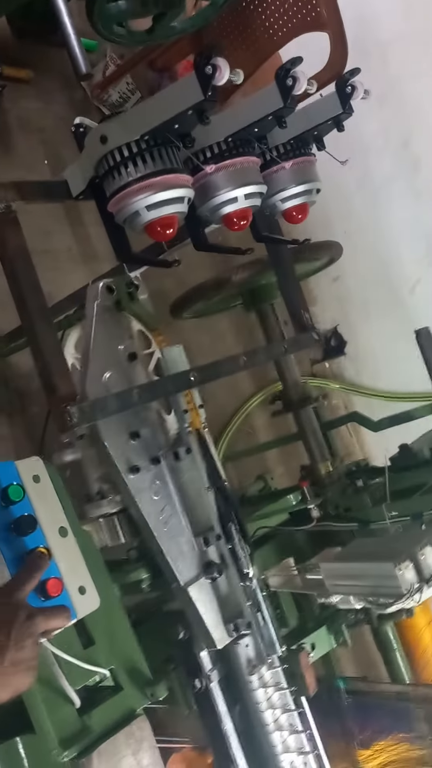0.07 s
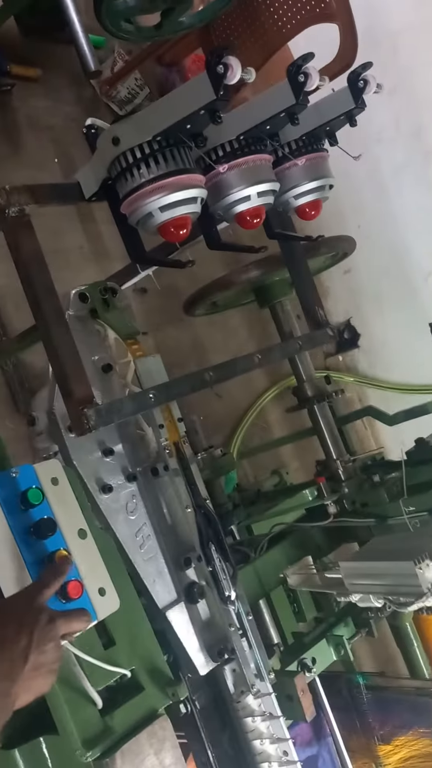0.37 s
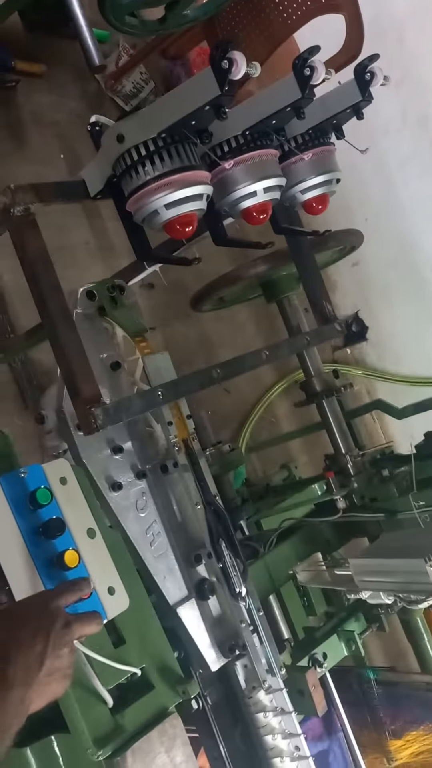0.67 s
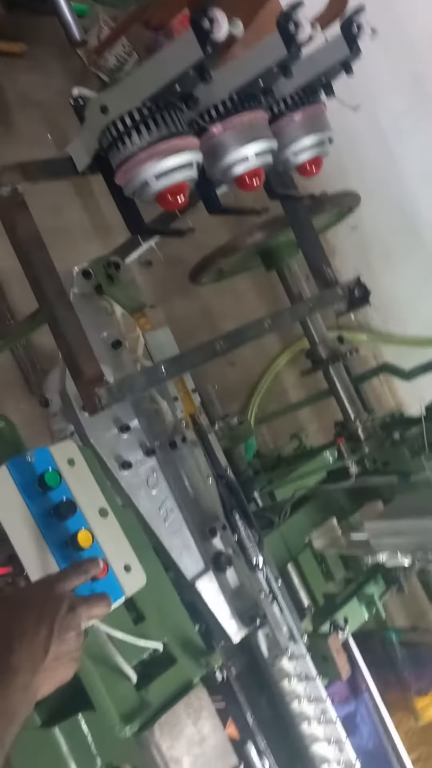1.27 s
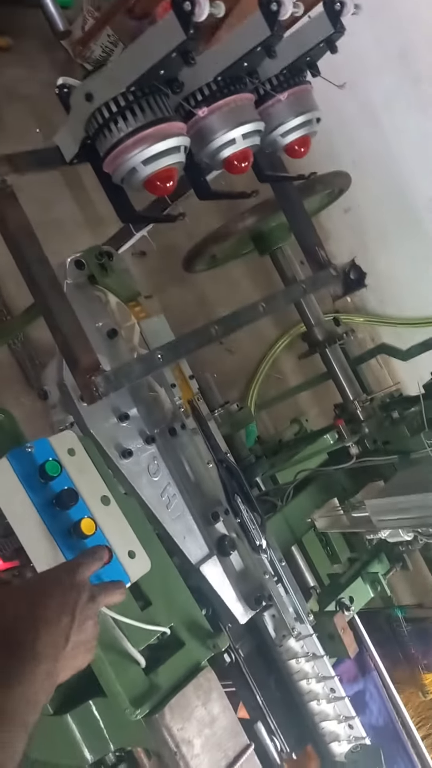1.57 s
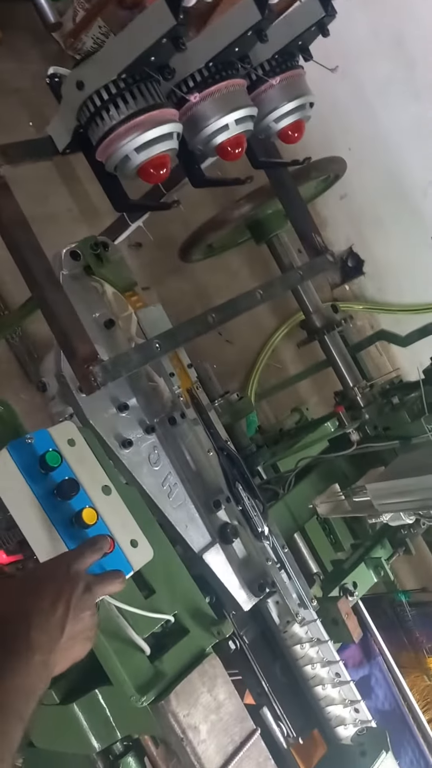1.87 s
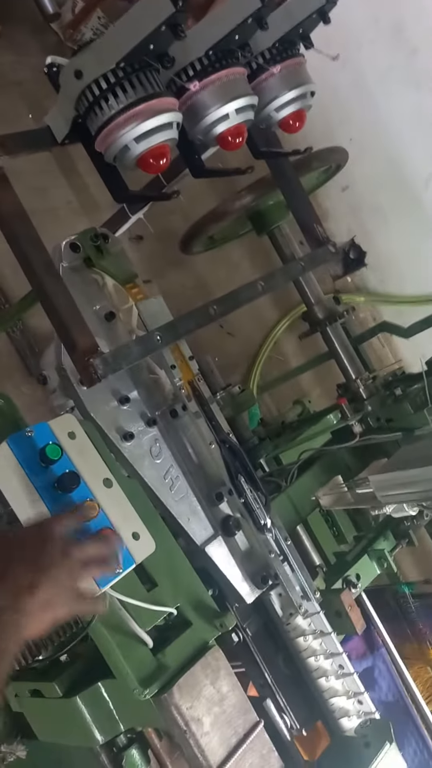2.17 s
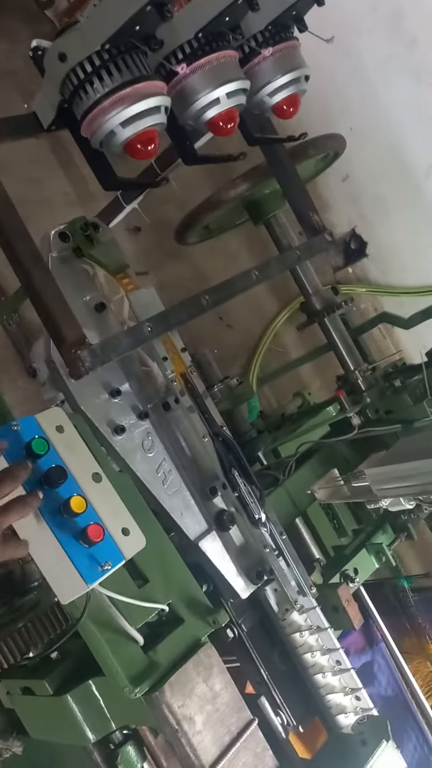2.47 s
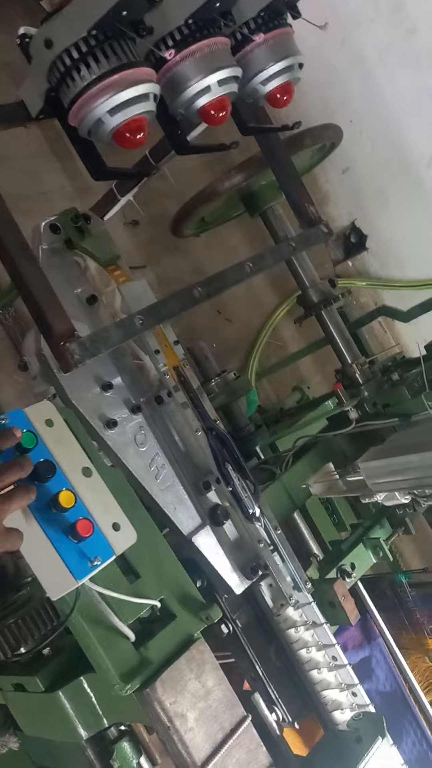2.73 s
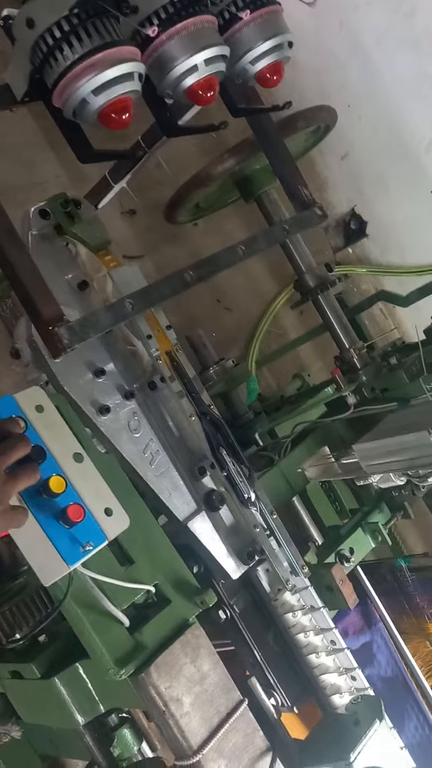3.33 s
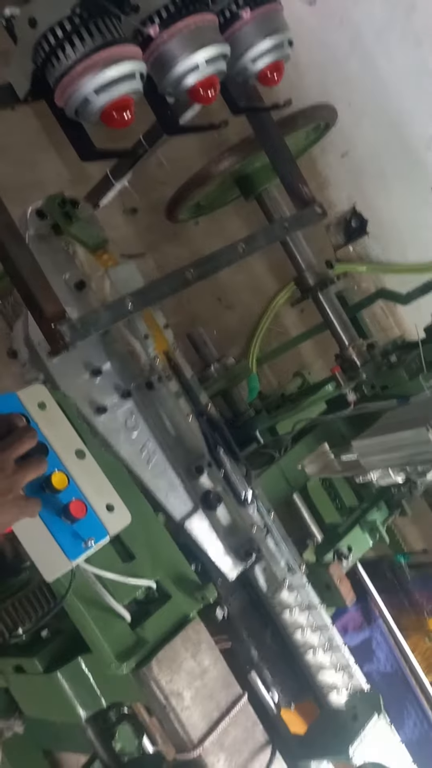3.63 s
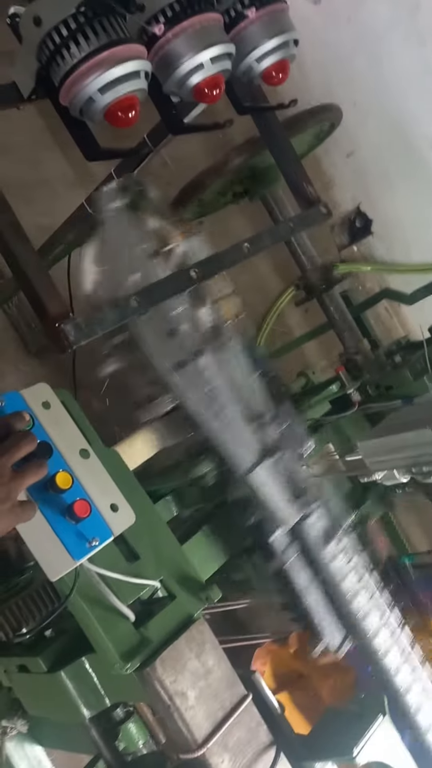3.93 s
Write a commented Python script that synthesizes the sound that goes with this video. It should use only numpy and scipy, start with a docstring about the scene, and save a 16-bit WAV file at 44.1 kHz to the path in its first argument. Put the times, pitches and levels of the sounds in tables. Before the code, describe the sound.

A weaving machine gives a short, loud burst of metallic rattling with motor hum and thin squeaks. Quiet button clicks fill the lull before it suddenly starts again, ringing through the workshop.

```python
"""Inching a narrow-fabric loom

A loom is inched twice from its button box in a hard, echoing workshop. Each time the drive engages
with a clunk, the motor hums, and the impacts of gears, levers and wire heddles excite the frame's
resonances while dry guides squeak. In the lull the frame drones out, push buttons click and a hand
brushes past, over a faint air hiss."""
import sys
import numpy as np
from scipy import signal
from scipy.fft import rfft, irfft
from scipy.io import wavfile

SR = 44100
rng = np.random.default_rng(int(sys.argv[2]) if len(sys.argv) > 2 else 0)


def persist_wave(psi):
    """Save psi, clipped to +-1, as 16-bit WAV."""
    counts = np.round(np.clip(psi, -1, 1) * 32767).astype(np.int16)
    wavfile.write(sys.argv[1], SR, np.atleast_2d(counts).T)


N = 176400
LEAD = SR // 4  # samples before t = 0 in which the filters settle
TIME = np.arange(-LEAD, N) / SR
HZ = np.fft.rfftfreq(4096, 1 / SR)

# Reverberation time of the workshop: f/Hz, T60/s
REVERB_TIME = [(80, 2.4), (300, 0.71), (1000, 0.81), (3000, 0.68), (6000, 0.48), (10000, 0.38),
               (16000, 0.45)]
# Coherence of the diffuse field: f/Hz, left-right correlation
COHERENCE = [(60, 0.92), (150, 0.95), (300, 0.87), (550, 0.41), (1000, -.05), (2000, -0.14), (5000, .05),
             (16000, -0.26)]
# Imbalance of the microphone ports: f/Hz, left minus right/dB
PORT_BALANCE = [(100, 1.6), (600, 0.5), (1200, 1.6), (2500, -2.3), (4500, -2.5), (7000, 10.5), (9500, 8.5),
                (13000, 3), (16000, 2.5)]
# Spectra of room noise, air hiss, rubbing cloth and a button click: f/Hz, relative level/dB
AIR_SPECTRUM = [(20, -54.5), (35, -32), (50, -17.5), (72, -3), (120, -7.5), (177, -13.5), (215, -10),
                (344, -16.5), (426, -16.5), (560, -19.5), (1000, -27.5), (1540, -27), (2500, -33.5),
                (5000, -36.5), (6500, -61.5)]
HISS_SPECTRUM = [(100, -50), (1000, -28), (5000, -19), (5700, -3.5), (6300, -6), (6900, 0), (7600, -16),
                 (8500, -14), (9500, -21.5), (16000, -28)]
CLOTH_SPECTRUM = [(40, -49), (150, -13), (600, -1), (1500, 0.5), (4200, 1.5), (6000, -4), (9000, -9),
                  (13000, -6), (16000, -10.5)]
BUTTON_SPECTRUM = [(100, -19), (400, -7), (650, 3.5), (950, -4.5), (1400, 1), (3000, -1), (5000, -1.5),
                   (7500, -3.5), (9300, -6.5), (12500, 2.5), (14500, -2.5), (16000, -8)]
# Strokes of hand and sleeve: centre t/s, half-length/s, level/dB, treble tilt/(dB per octave)
BRUSH_STROKES = [(2.12, .05, -60.5, -3), (2.351, 0.042, -67.5, -4.5), (2.587, 0.06, -59, 1.5)]
# Button clicks: t/s, level/dB, then lift/dB in each of the four button resonances
BUTTON_CLICKS = [(0.0219, -43, -1.5, 12, 8, 4), (0.6806, -37.5, -4, -14, 16, 4.5),
                 (0.8727, -43.5, 1, 8.5, -3, 5.5), (1.3678, -47.5, 13, 13.5, 6, 3),
                 (1.6486, -48.5, 3, -4, -2, 4), (1.8626, -49, 12.5, -4, -4, 4.5),
                 (2.0392, -43.5, 8, 6, 1.5, 7), (3.4884, -51, 13, -6, -3, 8), (3.523, -49, 4, 1, -2, 5)]
# Button resonances (box knock, plate ring, mid snap, high ring): f/Hz, half-width/Hz
BUTTON_MODES = [(660, 170), (1220, 58), (2600, 910), (7400, 1000)]
# Squeaks of dry guides: start t/s, length/s, f/Hz, level/dB
GUIDE_SQUEAKS = [(.11, .08, 10250, -51), (.32, 0.11, 11230, -45.5), (.37, 0.093, 12660, -49),
                 (.29, 0.12, 15542, -53), (.3, 0.081, 7100, -49), (3.62, 0.16, 10270, -48.5),
                 (3.65, 0.14, 7500, -46), (3.65, 0.12, 8500, -48), (3.83, 0.13, 10200, -50),
                 (3.77, 0.14, 11870, -57), (3.77, 0.16, 6200, -45)]
# Resonances of the cast frame: f/Hz, width/Hz, lift/dB
FRAME_MODES = [(214, 22, 3.5), (263, 47, 4.5), (316, 51, 4.5), (504, 56, 3), (770, 20, 3), (804, 34, 1.5),
               (790, 51, -0.5), (923, 40, 4), (1360, 45, 5.5), (1548, 89, 6.5), (2042, 80, 7.5),
               (2705, 40, 4.5), (3430, 15, 5.5)]
# Drone of the frame: f/Hz, level/dB, start of decay t/s, decay while turning/(dB per s)
DRONE_PARTIALS = [(109.8, -36.5, 0.55, 26.5), (68.1, -45.5, .45, 20)]
# Spans of motor power: on t/s, off t/s
POWER_SPANS = [(.16, .42), (3.57, 3.97)]
# Blows in the drive: t/s, level/dB, treble tilt/(dB per octave), scatter time/s, reverberation/dB
DRIVE_BLOWS = [(.023, -33, -7, 0.0038, -0.5), (0.0753, -13, 0.2, .016, 4.5), (.271, -20, -1, 0.0037, -6),
               (.308, -18, -6.5, 0.002, -7.5), (.346, -22.5, -7, 0.0027, -7),
               (0.475, -25, -0.5, .002, -6.5), (.4994, -21, -2, .008, -5), (3.5414, -17, 0.9, 0.028, 5.5),
               (3.595, -20.5, -8, .006, 5.5), (3.7712, -19.5, 2.5, 0.011, 4)]
# Spectra of the belt, a blow and the moving parts: f/Hz, relative level/dB
BELT_SPECTRUM = [(25, -35), (40, -31), (52, -13), (70, 1.5), (95, -2.5), (115, -4.5), (145, -2), (200, -23),
                 (1000, -71)]
BLOW_SPECTRUM = [(40, -48), (130, -17), (215, -1), (310, -1.5), (400, -7.5), (520, -3), (900, -8),
                 (1200, -14.5), (1600, -14), (4500, -19.5), (6500, -28.5), (16000, -37)]
GEAR_SPECTRUM = [(30, -54), (50, -37.5), (75, -21), (115, -24), (160, -12.5), (200, -8), (260, -5),
                 (330, 0), (420, -2.5), (520, -5), (750, -17.5), (2000, -34), (16000, -78)]
LEVER_SPECTRUM = [(60, -49.5), (300, -16.5), (500, 1), (800, -0.5), (1100, -2), (1500, -5.5), (2200, -12.5),
                  (5000, -28.5), (16000, -50)]
HEDDLE_SPECTRUM = [(40, -60), (200, -30.5), (700, -8.5), (1500, 0), (2200, -1.5), (3000, .5), (4200, -.5),
                   (6000, -12.5), (9000, -16.5), (12000, -12), (16000, -18.5)]
# Envelopes of the two runs: t/s, gear level/dB, lever level/dB, heddle level/dB
FIRST_RUN_LEVELS = [(0, -38.5, -40.5, -54), (.07, -45, -65, -54), (.09, -35, -29.5, -43.5),
                    (.17, -28, -34, -28.5), (.2, -27, -25, -18.5), (.24, -19, -19, -22),
                    (.3, -24.5, -31, -25), (.38, -29, -26.5, -29.5), (.5, -29, -31, -38),
                    (.62, -36, -38, -53), (.8, -43, -52.5, -60), (.97, -54, -88.5, -77),
                    (1.15, -68.5, -80, -92), (1.6, -76, -88.5, -108.5)]
SECOND_RUN_LEVELS = [(3.54, -42, -30, -33.5), (3.62, -33.5, -28, -34.5), (3.7, -30, -32, -37.5),
                     (3.765, -36, -24, -46), (3.81, -26.5, -28, -27), (3.86, -29, -22, -22.5),
                     (3.92, -30.5, -22.5, -42.5), (4, -31, -37.5, -38)]


def amp(db):
    """Amplitude ratio of a level in decibels."""
    return 10 ** (np.asarray(db) / 20)


def unit(x):
    """Normalisation to an rms of 1."""
    return x / np.sqrt(np.mean(x ** 2) + 1e-20)


def curve(points, hz=HZ):
    """Interpolation on a logarithmic frequency axis."""
    f, value = np.transpose(points)
    return np.interp(np.log(hz + 1), np.log(f + 1), value)


def add(mix, start_s, sound):
    """Superposition of a stereo sound on the mix."""
    part = mix[:, round(start_s * SR):][:, :sound.shape[1]]
    part += sound[:, :part.shape[1]]


def tilt(db_per_octave):
    """Spectral slope above 500 Hz, as a lift in dB."""
    return db_per_octave * np.log2(np.maximum(HZ / 500, 1))


def colour(x, spectrum_db):
    """Minimum-phase filtering at unit energy: folding the cepstrum makes the response causal."""
    cepstrum = irfft(np.log(amp(spectrum_db)))
    half = len(cepstrum) // 2
    folded = np.r_[cepstrum[0], 2 * cepstrum[1:half], np.zeros(half)]
    response = irfft(np.exp(rfft(folded)))
    return signal.oaconvolve(x, response / np.linalg.norm(response))


def wander(count, rate_hz):
    """Random modulation: low-pass noise with an rms near 1."""
    hz = np.fft.rfftfreq(N * 2, 1 / SR)
    white = rfft(rng.standard_normal(N * 2))
    return unit(irfft(white * np.exp(-(hz / rate_hz) ** 2)))[:count]


def diffuse(count, dying=False):
    """Diffuse field: noise coherent between the ears in the bass; if dying, it falls 60 dB per T60."""
    hz, t, (left, other) = signal.stft(rng.standard_normal((2, count)), SR, nperseg=512)
    coherence = np.clip(curve(COHERENCE, hz), -1, 1)[:, None]
    field = np.array([left, coherence * left + np.sqrt(1 - coherence ** 2) * other])
    if dying:
        field = field * amp(-60 * t / curve(REVERB_TIME, hz)[:, None])
    return signal.istft(field, SR, nperseg=512)[1][:, :count]


def room(x, direct_db, wet_db):
    """Reverberation: convolution with a direct impulse and a diffuse tail."""
    tail = diffuse(SR * 3 // 2, dying=True)
    tail *= np.minimum(np.arange(tail.shape[1]) / SR / 0.0027, 1)  # reflections build up
    response = tail * amp(wet_db) / np.linalg.norm(tail[0])
    response[:, 0] += amp(direct_db)
    return signal.fftconvolve(x[None], response, axes=1)


def strike(spectrum_db, scatter_s, direct_db, wet_db):
    """Impact response: sharp front, short scatter and room tail, with about the energy of 10 ms at rms 1."""
    t = np.arange(SR * 3 // 2) / SR
    tail = diffuse(len(t), dying=True) * np.minimum(t / 0.0063, 1)
    scatter = diffuse(len(t)) * np.exp(-t / scatter_s)
    blow = scatter / np.linalg.norm(scatter[0]) + amp(wet_db) * tail / np.linalg.norm(tail[0])
    blow[:, 0] += amp(direct_db)
    gain = np.sqrt(SR / 100) / np.linalg.norm(blow[0])
    return gain * np.array([colour(x, spectrum_db) for x in blow])


def frame_lift():
    """Resonance: each mode of the frame adds a Lorentzian peak, in dB, to the spectrum of an impact."""
    return sum(db / (1 + (2 * (HZ - hz) / width) ** 2) for hz, width, db in FRAME_MODES)


def workshop_air():
    """Diffuse background: low room noise and a narrow band of air hiss, stronger on the left."""
    air = np.array([colour(x, curve(AIR_SPECTRUM))[LEAD:LEAD + N] for x in diffuse(len(TIME))])
    hiss = np.array([colour(x, curve(HISS_SPECTRUM))[LEAD:LEAD + N] for x in diffuse(len(TIME))])
    hiss_level = amp(-75.5 + 0.84 * wander(N, rate_hz=14))
    pan = amp([[1.5], [-1.5]])
    return amp(-66.5) * air + hiss * hiss_level * pan


def brushes():
    """Sliding friction: hand and sleeve rub the box in Gaussian swells of noise."""
    out = np.zeros((2, N))
    for centre_s, half_s, db, slope in BRUSH_STROKES:
        t = np.arange(-3 * half_s, 3 * half_s, 1 / SR)
        friction = rng.standard_normal(len(t)) * np.exp(-(t / half_s) ** 2)
        rub = colour(friction, curve(CLOTH_SPECTRUM) + tilt(slope))
        add(out, centre_s + t[0], amp(db) * room(rub, direct_db=-5.5, wet_db=1.5))
    return out


def buttons():
    """Impulse excitation: each snap of a plastic button weights the resonances of its box differently."""
    out = np.zeros((2, N))
    for start_s, db, *lifts_db in BUTTON_CLICKS:
        lift = sum(peak_db * np.exp(-((HZ - hz) / width) ** 2)
                   for peak_db, (hz, width) in zip(lifts_db, BUTTON_MODES))
        click = strike(curve(BUTTON_SPECTRUM) + lift, scatter_s=0.0014, direct_db=-9.5, wet_db=1.5)
        add(out, start_s, amp(db) * click)
    return out


def squeaks(jitter_hz=65, stutter_db=3.5):
    """Friction-excited vibration: steel sliding in dry guides gives thin, ragged tones."""
    out = np.zeros((2, N))
    for start_s, length_s, hz, db in GUIDE_SQUEAKS:
        t = np.arange(0, length_s, 1 / SR)
        cycles = np.cumsum(hz + jitter_hz * wander(len(t), rate_hz=120)) / SR
        tone = np.sqrt(np.sin(np.pi * t / length_s)) * np.sin(2 * np.pi * cycles)
        stutter = amp(stutter_db * wander(len(t), rate_hz=66))
        add(out, start_s, amp(db) * room(tone * stutter, direct_db=-3.5, wet_db=-2))
    return out


def wavering_tone(hz, drift_hz, rate_hz):
    """Random frequency modulation of a sine with an rms of 1."""
    cycles = np.cumsum(hz + drift_hz * wander(N, rate_hz)) / SR
    return np.sqrt(2) * np.sin(2 * np.pi * cycles)


def frame_drone(rest_s=1.65):
    """Damped vibration: the frame swells with the first run, decays, and dies once the shaft rests."""
    t, out = TIME[LEAD:], np.zeros(N)
    for hz, db, decay_start_s, db_per_s in DRONE_PARTIALS:
        swell = np.minimum((t + 0.11) / decay_start_s, 1)
        decay_db = db_per_s * np.maximum(t - decay_start_s, 0)
        level = swell * amp(db - decay_db + 3.4 * wander(N, rate_hz=40))
        out += level * wavering_tone(hz, drift_hz=1.6, rate_hz=8.1)
    return out * np.exp(-np.maximum(t - rest_s, 0) / 0.12)


def motor(rise_s=0.097, decay_s=0.16):
    """Forced vibration: motor hum and belt rumble grow under power and fade when it is cut."""
    t = TIME[LEAD:]
    envelope = sum(np.clip((t - on) / rise_s, 0, 1) * np.exp(-np.maximum(t - off, 0) / decay_s)
                   for on, off in POWER_SPANS)
    hum = amp(-37) * wavering_tone(hz=97.3, drift_hz=2.5, rate_hz=12)
    belt = amp(-39.5) * colour(rng.standard_normal(N), curve(BELT_SPECTRUM))[:N]
    return envelope * (hum + belt)


def drive_knocks(ring_weight=1.4):
    """Impact excitation: the drive engages and slack parts strike the frame, ringing its modes."""
    out = np.zeros((2, N))
    for start_s, db, slope, scatter_s, wet_db in DRIVE_BLOWS:
        spectrum_db = curve(BLOW_SPECTRUM) + ring_weight * frame_lift() + tilt(slope)
        add(out, start_s, amp(db) * strike(spectrum_db, scatter_s, direct_db=-13.5, wet_db=wet_db))
    return out


def rattle(spectrum, column, hits_per_s, spread_db, direct_db):
    """Shot noise: random small impacts of one group of parts follow its level column in both runs."""
    size = amp(spread_db * np.minimum(rng.exponential(1, len(TIME)), 4))
    polarity = rng.choice([-1, 1], len(TIME))
    struck = rng.random(len(TIME)) < hits_per_s / SR
    first, second = np.array(FIRST_RUN_LEVELS), np.array(SECOND_RUN_LEVELS)
    level = amp(np.interp(TIME, first[:, 0], first[:, column], right=-np.inf))
    level += amp(np.interp(TIME, second[:, 0], second[:, column], left=-np.inf))
    ringing = colour(unit(size * polarity * struck) * level, curve(spectrum) + frame_lift())
    return room(ringing, direct_db, wet_db=-2.7)[:, LEAD:LEAD + N]


def mechanism():
    """Impact noise in three registers: gears rumble, levers clatter and wire heddles rattle."""
    gears = rattle(GEAR_SPECTRUM, column=1, hits_per_s=700, spread_db=1, direct_db=-8)
    levers = rattle(LEVER_SPECTRUM, column=2, hits_per_s=450, spread_db=2.5, direct_db=-6.5)
    heddles = rattle(HEDDLE_SPECTRUM, column=3, hits_per_s=900, spread_db=2, direct_db=-10.5)
    return gears + levers + heddles


def scene():
    """Superposition of loom, operator and workshop."""
    loom = mechanism() + drive_knocks() + motor() + frame_drone() + squeaks()
    return loom + buttons() + brushes() + workshop_air()


def record(dry):
    """Linear filtering: two microphone ports of unlike response, then a low-pass band limit."""
    half_balance_db = curve(PORT_BALANCE, np.fft.rfftfreq(2 * N, 1 / SR)) / 2
    ports = irfft(rfft(dry, 2 * N) * amp([half_balance_db, -half_balance_db]))[:, :N]
    low_pass = signal.firwin(301, cutoff=15900, window=("kaiser", 9), fs=SR)
    return signal.oaconvolve(ports, low_pass[None], "same")


dry = scene()
out = record(dry)
persist_wave(out)
```